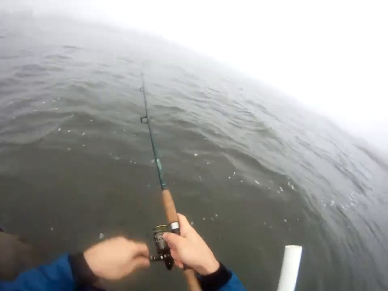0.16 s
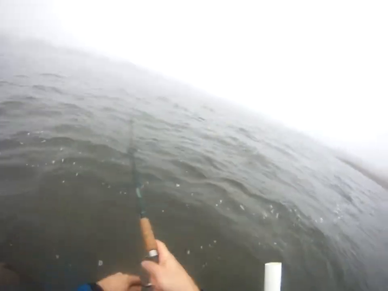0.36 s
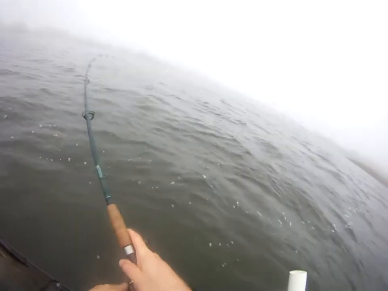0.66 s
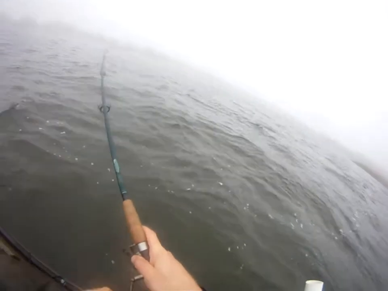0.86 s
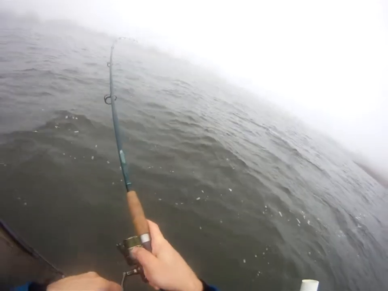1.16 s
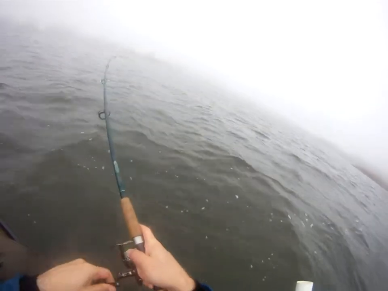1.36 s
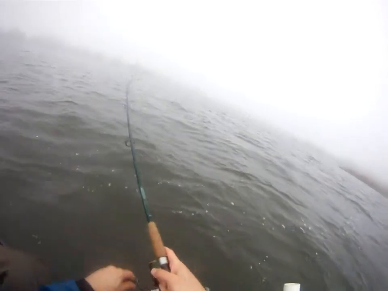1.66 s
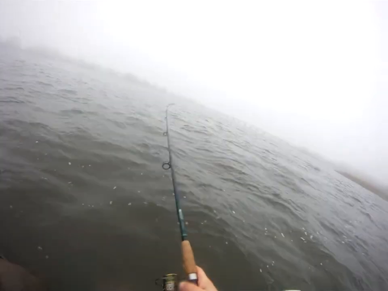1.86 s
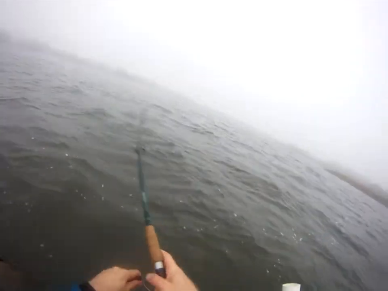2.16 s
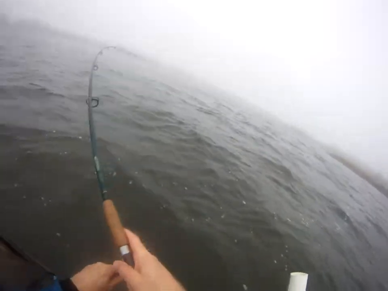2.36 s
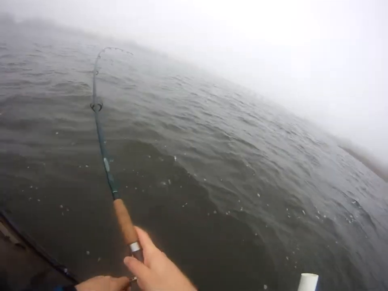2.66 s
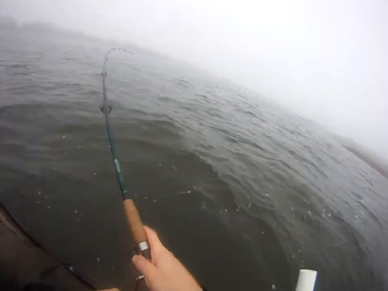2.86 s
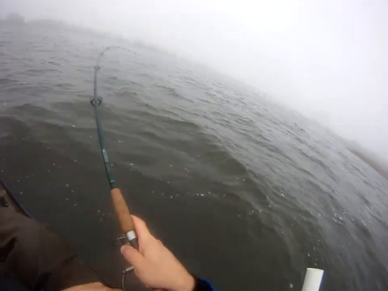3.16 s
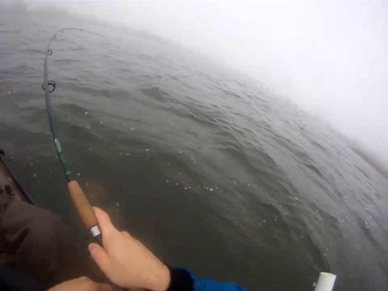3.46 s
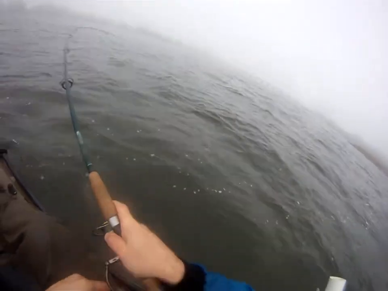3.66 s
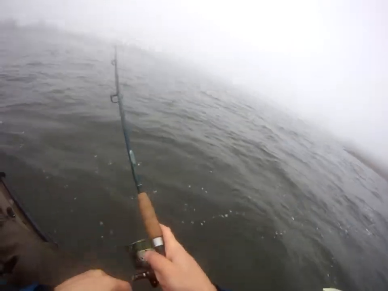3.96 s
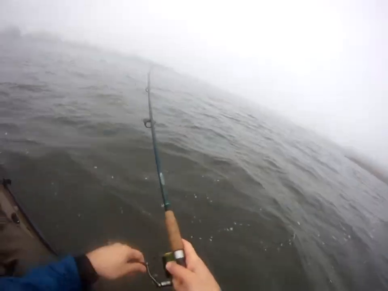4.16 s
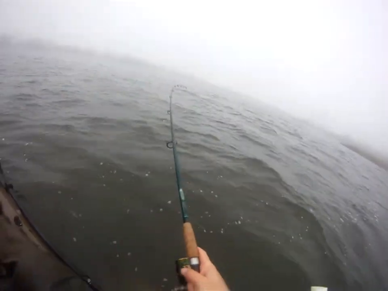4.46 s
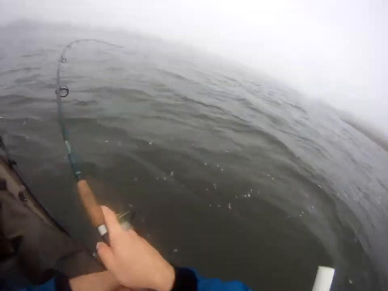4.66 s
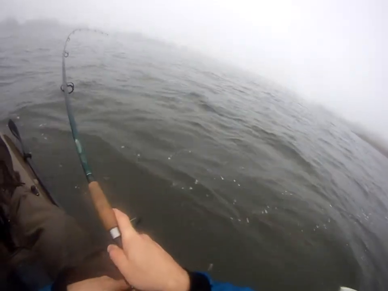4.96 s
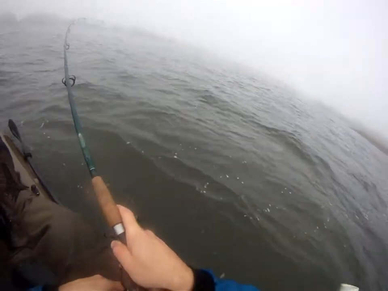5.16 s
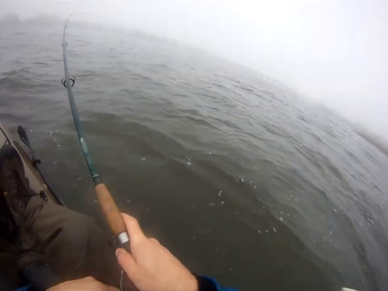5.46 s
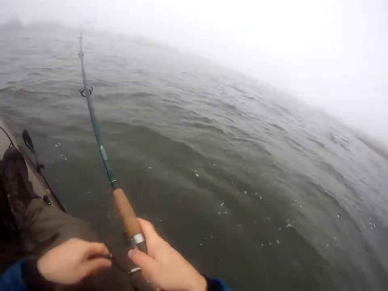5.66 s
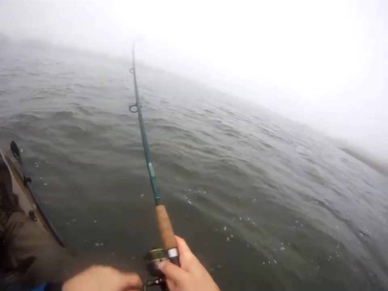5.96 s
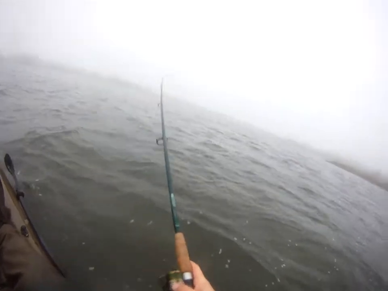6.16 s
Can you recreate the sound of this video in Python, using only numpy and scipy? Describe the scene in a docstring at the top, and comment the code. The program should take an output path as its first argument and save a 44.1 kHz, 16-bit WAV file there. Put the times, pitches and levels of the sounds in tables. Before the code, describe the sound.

Wind rumbles and water laps at a kayak while a fishing reel whirs and clicks, with short rasps of line.

```python
"""An angler in a kayak plays a fish. From the start, wind rumbles and wavelets lap and thud at the hull.
At 0.2 s he hauls the rod up: line and sleeve rasp, and the drag's pawl buzzes as the fish takes line.
He cranks, gears whirring, and hauls again at 2.1 s; the drag runs on, ticking faster, then slower.
A few knocks on the boat precede the third haul at 4.6 s. Last, he cranks and the taut line whines.
All is heard in mono through a small body-worn camera."""
import sys
import numpy as np
from scipy import signal
from scipy.fft import rfft, irfft, next_fast_len
from scipy.io import wavfile
from scipy.ndimage import uniform_filter1d, map_coordinates

SR = 44100
rng = np.random.default_rng(int(sys.argv[2]) if len(sys.argv) > 2 else 0)


def dump_mix(stems):
    """Bounce the given channels to the path in sys.argv[1] as a 16-bit WAV at rate SR."""
    frames = np.atleast_2d(stems).T  # one column per channel
    limited = np.clip(frames, -1, 1)  # hard clip at full scale
    pcm = np.round(limited * 32767).astype(np.int16)
    wavfile.write(sys.argv[1], SR, pcm)


N = 278271

# Table levels are relative; the functions add their own trims.
# Rod strokes. Each row: start and length in seconds, then line, spool, guide and sleeve levels in dB.
HAULS = [(0.238, 0.044, -43.5, -58, -50.5, -49), (0.392, .15, -46, -55.5, -52, -59.5),
         (2.114, 0.2, -47, -54.5, -49, -66), (2.238, .095, -49.5, -58.5, -63, -58.5),
         (3.214, 0.066, -53.5, -63.5, -73, -64.5), (4.573, 0.15, -45.5, -53.5, -55, -59)]
# Squeals at the top of a haul. Each row: crest and half-length in seconds, spool and guide levels in dB.
SQUEALS = [(2.145, 0.0063, -41.5, -50), (2.192, 0.019, -53, -39), (4.606, 0.011, -37, -52),
           (4.619, 0.02, -45, -35), (4.656, 0.017, -37.5, -42)]
# The fish takes line. Each row: start, fastest moment and end in seconds, top speed in clicks a second,
# click level in dB at the usual speed.
PULLS = [(0.384, 0.483, .626, 560, -52), (0.631, 0.699, .859, 160, -54), (1.257, 1.36, 1.4416, 30.3, -54.5),
         (1.93, 1.96, 2.0171, 30, -53), (2.03, 2.205, 2.29, 790, -49.5), (2.29, 2.309, 2.3984, 600, -48.5),
         (2.5566, 2.718, 2.9296, 142, -52), (3.077, 3.26, 3.3633, 145, -51.5),
         (3.3903, 3.379, 3.4887, 70, -48.5), (4.139, 4.215, 4.2394, 115, -55.5),
         (4.3903, 4.402, 4.4623, 48, -56), (4.538, 4.629, 4.8257, 540, -49.5)]
# The drag gives one tooth. Each row: time in seconds, level in dB.
TICKS = [(.9817, -55), (1.1017, -50), (1.1955, -56), (1.5105, -53.5), (1.564, -54), (1.606, -53.5),
         (2.451, -50.5), (2.4952, -48.5), (2.5238, -47), (3.5422, -52), (3.6112, -50), (3.6721, -59),
         (3.7466, -56), (3.8033, -55), (3.863, -54.5), (4.0996, -55), (4.917, -51.5), (5.01, -50.5),
         (5.058, -48), (5.0978, -51), (5.1455, -50), (5.221, -48)]
# Spells of cranking. Each row: start and length in seconds, level in dB, top whirr pitch in Hz.
CRANKS = [(0.0, 0.14, -60.5, 2220), (.66, 0.35, -65, 2140), (1.03, 0.18, -62.5, 2230),
          (1.468, .1, -62, 1980), (1.734, 0.31, -63, 2112), (2.39, 0.12, -61, 1930), (3.39, .16, -67, 1990),
          (3.937, 0.25, -59.5, 2307), (4.26, 0.028, -62, 2009), (4.331, 0.039, -57.5, 2330),
          (4.47, 0.078, -65, 2000), (5.19, .13, -66.5, 2153), (5.33, 0.44, -61, 2270),
          (5.78, 0.26, -62, 2364), (6.03, 0.086, -56, 2380), (6.15, 0.11, -59, 1978)]
# Whine of taut line. Each row: time in seconds, pitch in Hz, level in dB.
WHINE = [(5.3, 5450, -100), (5.42, 5510, -83), (5.56, 5626, -75), (5.68, 5664, -77), (5.78, 5380, -100)]
# Catches of line and sleeve. Each row: start in seconds, level in dB, centre in Hz.
SCUFFS = [(.0857, -49, 2010), (0.2472, -40, 1950), (0.413, -30.5, 1930), (0.5124, -36, 2180),
          (.5891, -39, 1940), (1.1702, -44, 2290), (1.5005, -44.5, 3750), (2.2458, -41, 1877),
          (3.4054, -48.5, 2190), (3.7274, -51.5, 1884), (4.5718, -38, 2021), (4.6998, -30.5, 1878),
          (4.8813, -42.5, 2450), (5.1351, -44, 2340), (5.459, -49, 1815), (5.5201, -43, 1930),
          (6.0541, -42, 1910)]
# Taps on the boat. Each row: start in seconds, level in dB, pitch in Hz.
KNOCKS = [(2.868, -45.5, 2146), (3.0095, -43, 1090), (4.264, -40.5, 1820)]
# Wavelets on the hollow hull. Each row: start in seconds, level in dB, centre in Hz.
THUDS = [(1.038, -47, 105), (2.098, -45, 113), (2.289, -48, 92), (2.863, -43, 88.8), (2.94, -48, 92)]
# Gusts on the microphone. Each row: crest and half-length in seconds, level in dB.
GUSTS = [(0.263, 0.24, -44.5), (0.542, 0.045, -39), (0.73, 0.095, -44), (1.199, .16, -49.5),
         (1.69, .08, -52), (2.245, 0.43, -41.5), (2.676, 0.17, -70), (4.173, 0.027, -40), (4.567, .11, -45),
         (5.436, 0.087, -56), (5.863, 0.087, -63), (6.17, 0.21, -47.5)]
# Soft rush of air. Each row: time in seconds, level in dB.
RUSH = [(0, -57.5), (0.27, -59), (0.6, -57.5), (0.88, -60.5), (1.08, -57), (1.52, -59.5), (2.12, -56),
        (2.7, -57), (2.9, -55.5), (3.2, -57.5), (3.7, -59), (4.3, -56.5), (4.7, -54.5), (5.05, -60.0),
        (5.62, -53.5), (6.31, -57)]

# Resonances. Each row: centre in Hz, width in Hz, gain in dB.
SPOOL_MODES = [(2918, 75, -1.5), (3083, 23, 5.5)]
GUIDE_MODES = [(3560, 96, 6), (3746, 93, -1)]
PAWL_MODES = [(4750, 150, 2), (5420, 324, -4.5)]

# Spectra. Each row: frequency in Hz, gain in dB.
LINE_SPECTRUM = [(500, -55), (900, -17), (1200, -2.5), (1550, -15.5), (1900, 6.5), (2200, 1.5),
                 (2650, -6.5), (3050, -23), (3300, -12), (3560, -0.5), (3850, -4), (4300, -20),
                 (5800, -13.5)]
SLEEVE_SPECTRUM = [(150, -9), (270, 3.5), (420, -29), (600, -12.5), (850, -3.5), (1200, -0.5), (1500, -4),
                   (2500, -15), (5000, -45)]
CRANK_SPECTRUM = [(500, -29), (900, -20), (1200, 0.5), (1550, -10.5), (1900, 2), (2250, 1.5), (2750, -10),
                  (3050, -3), (3280, -19), (3600, -5), (4300, -16), (5400, -15), (5900, -46)]
HULL_SPECTRUM = [(250, -19), (900, 14), (2200, 4), (4000, -14)]
WATER_SPECTRUM = [(100, -24), (300, 6.5), (550, 2.5), (1150, 2), (1550, 0), (2100, 4), (2800, -2),
                  (3600, -2), (4300, -8.5), (5000, -9), (5900, -9)]
BUFFET_SPECTRUM = [(8, -12.5), (14, 6), (25, -2), (42, -4), (55, -6), (75, -15.5), (110, -29), (200, -75)]
AIR_SPECTRUM = [(40, -38), (75, -3.5), (105, 1), (170, -5), (260, -9), (350, -22), (600, -29), (1200, -33)]


def hauls(attack_s=0.028, release_s=0.064):
    """Taut line rasps over ringing guides, the spinning spool sings, the sleeve brushes the jacket."""
    strokes = (np.outer(amp(dbs), stroke(s, length_s, attack_s, release_s))
               for s, length_s, *dbs in HAULS)
    line_gain, spool_gain, guide_gain, sleeve_gain = power_sum(strokes)
    squeals = (np.outer(amp(dbs), swell(s, half_s)) for s, half_s, *dbs in SQUEALS)
    spool_squeal, guide_squeal = power_sum(squeals)
    line = amp(-1.5 + 1.2 * wobble(70)) * line_gain
    line *= friction(colour(LINE_SPECTRUM), slips_per_s=6000, spread_db=2, patchy_db=2)
    spool = amp(-2 + 0.63 * wobble(70)) * power_sum([spool_gain, spool_squeal])
    spool *= friction(resonant(SPOOL_MODES), slips_per_s=3000, spread_db=1, patchy_db=2)
    guides = amp(-7.5) * power_sum([guide_gain, guide_squeal])
    guides *= friction(resonant(GUIDE_MODES), slips_per_s=4000, spread_db=0, patchy_db=2.5)
    sleeve = amp(-0.5) * sleeve_gain
    sleeve *= friction(colour(SLEEVE_SPECTRUM), slips_per_s=6000, spread_db=2.5, patchy_db=5)
    return line + spool + guides + sleeve


def drag(usual_hz=50, db_per_octave=0.47, jitter_s=0.00065, scatter_db=1.57):
    """One click a tooth, singly or in runs; a faster spool flicks the pawl harder."""
    clicks = list(TICKS)
    for *motion, db in PULLS:
        clicks += [(s, db + db_per_octave * np.log2(hz / usual_hz)) for s, hz in teeth(*motion)]
    out = np.zeros(N)
    for s, db in clicks:
        add(out, s + rng.normal(0, jitter_s), amp(db + rng.normal(0, scatter_db)) * pawl_click())
    return out


def teeth(start_s, fastest_s, end_s, top_hz, start_hz=28, stop_hz=42):
    """Time and click rate at each tooth as the spool speeds up and slows exponentially."""
    t = np.linspace(start_s, end_s, SR // 10)
    rate_hz = np.exp(np.interp(t, [start_s, fastest_s, end_s], np.log([start_hz, top_hz, stop_hz])))
    turned = np.cumsum(rate_hz) * (t[1] - t[0])
    marks = np.linspace(0, turned[-1], round(turned[-1]) + 1)
    return zip(np.interp(marks, turned, t), np.interp(marks, turned, rate_hz))


def pawl_click(drop_s=0.0003, rebound_s=0.0014, rebound_db=-3, rattle_db=-23, t60_s=0.043):
    """The pawl drops off a tooth, rebounds once and rattles out; pitch varies by tooth. Peak 1."""
    t = np.arange(SR // 60) / SR
    contact = amp(rattle_db - 60 * t / t60_s) * rng.standard_normal(len(t))
    add(contact, drop_s, [1])
    bounce_s = drop_s + rebound_s * np.exp(rng.normal(0, 0.24))
    add(contact, bounce_s, [amp(rebound_db + rng.normal(0, 1))])
    detune = np.exp(0.015 * rng.standard_normal())
    highpass = lambda f: 1 / np.sqrt(1 + (4200 / (f + 1)) ** 16)
    click = filtered(contact, lambda f: resonant(PAWL_MODES)(f / detune) * highpass(f))
    return click / np.abs(click).max()


def crank(attack_s=0.02, release_s=0.032, slow_hz=1945):
    """Gears whirr higher as the handle speeds up; line scrapes on roller and guides."""
    t = np.arange(N) / SR
    gain, pitch_hz = 0, slow_hz
    for s, length_s, db, top_hz in CRANKS:
        gain = np.maximum(gain, amp(db) * stroke(s, length_s, attack_s, release_s))
        pitch_hz += (top_hz - slow_hz) * np.sin(np.pi * np.clip((t - s) / length_s, 0, 1))
    scrape = amp(-1) * friction(colour(CRANK_SPECTRUM), slips_per_s=3000, spread_db=2, patchy_db=3.5)
    guides = amp(-13.5 + 1.5 * wobble(8))
    guides *= friction(resonant(GUIDE_MODES), slips_per_s=4700, spread_db=2.5, patchy_db=1.5)
    whirr = amp(-4.5) * narrow_noise(pitch_hz + 60 * wobble(16), width_hz=96)
    return amp(1 + 1.2 * wobble(45)) * gain * (scrape + guides + whirr)


def line_whine():
    """Taut line whines thinly on a gliding pitch."""
    hz, db = curves(WHINE)
    return amp(db) * narrow_noise(hz, width_hz=80)


def scuffs():
    """Line and sleeve catch briefly."""
    out = np.zeros(N)
    for s, db, hz in SCUFFS:
        catch = burst(hz, colour(LINE_SPECTRUM), width_hz=1800, attack_s=0.002, t60_s=0.041)
        add(out, s, amp(db - 0.5) * catch)
    return out


def knocks(tock_t60_s=0.0063):
    """Taps on the boat's dull plastic: a damped tone and a crack."""
    out, t = np.zeros(N), np.arange(SR // 10) / SR
    for s, db, hz in KNOCKS:
        tock = np.sin(2 * np.pi * hz * t) * amp(-60 * t / tock_t60_s)
        crack = amp(-4) * burst(hz, colour(HULL_SPECTRUM), width_hz=1500, attack_s=0.00018, t60_s=0.03)
        add(out, s, amp(db) * (tock + crack))
    return out


def hull_thuds():
    """A wavelet gives the hull a soft push that dies within a few cycles."""
    out = np.zeros(N)
    lowpass = lambda f: 1 / (1 + (f / 420) ** 4)
    for s, db, hz in THUDS:
        add(out, s, amp(db - 3) * burst(hz, lowpass, width_hz=90, attack_s=0.004, t60_s=0.07))
    return out


def water(wash_db=-62, lap_db=-69, bubble_hz=900, life_cycles=7, rise=0.226, count=260):
    """Chop washes steadily; lapping wavelets leave small bubbles that ring with rising pitch."""
    bubbles, t = np.zeros(N), np.arange(SR // 20) / SR
    for when, (pitch, size) in zip(rng.random(count), rng.standard_normal((count, 2))):
        hz = bubble_hz * np.exp(0.5 * pitch)
        age = t * hz / life_cycles
        envelope = amp(4.5 * size) * age * np.exp(1 - 2 * age)
        chirp = np.sin(2 * np.pi * hz * t * (1 + rise * age / 2))
        add(bubbles, when * N / SR, envelope * chirp)
    wash = amp(wash_db + 0.09 * wobble(4.96)) * noise(colour(WATER_SPECTRUM))
    return wash + amp(lap_db) * bubbles


def wind(breeze_db=-51):
    """Gusts over a steady breeze buffet the microphone port, with a softer rush above them."""
    gusts = [amp(db) * swell(s, half_s) for s, half_s, db in GUSTS]
    buffet = power_sum([amp(breeze_db)] + gusts) * noise(colour(BUFFET_SPECTRUM))
    rush_db, = curves(RUSH)
    return buffet + amp(rush_db - 3.5) * noise(colour(AIR_SPECTRUM))


def friction(response, slips_per_s, spread_db, patchy_db):
    """Tiny random slips ring a body whose colour shifts as the contact moves. Rms 1."""
    slips = (rng.random(N) < slips_per_s / SR) * rng.standard_normal(N)
    slips *= amp(spread_db * rng.standard_normal(N))
    spectra = signal.stft(slips, nperseg=512)[2]
    patches = uniform_filter1d(rng.standard_normal(spectra.shape), size=6, axis=0)
    patches = uniform_filter1d(patches, size=5, axis=1)
    force = signal.istft(spectra * amp(patchy_db * unit(patches)), nperseg=512)[1][:N]
    return unit(filtered(force, response))


def burst(hz, body, width_hz, attack_s, t60_s):
    """A short noisy contact on a body, with its own resonance. Peak 1."""
    t = np.arange(SR // 10) / SR
    push = rng.standard_normal(len(t)) * (1 - np.exp(-t / attack_s)) * amp(-60 * t / t60_s)
    sound = filtered(push, lambda f: body(f) * resonant([(hz, width_hz, 0)])(f))
    return sound / np.abs(sound).max()


def narrow_noise(hz, width_hz):
    """A noise band on a moving pitch. Rms 1."""
    drift = lambda: noise(lambda f: 1 / (1 + (f / width_hz) ** 2))
    phase = 2 * np.pi * np.cumsum(hz) / SR
    return unit(drift() * np.cos(phase) + drift() * np.sin(phase))


def noise(response):
    """Coloured noise. Rms 1."""
    return unit(filtered(rng.standard_normal(N), response))


def colour(points):
    """Response through (Hz, dB) points on a log axis."""
    hz, db = np.transpose(points)
    return lambda f: amp(np.interp(np.log(f + 1), np.log(hz), db))


def resonant(modes):
    """Causal response of resonances, alternating in sign."""
    return lambda f: sum((-1) ** k * amp(db) * 1j * f * width_hz / (hz * hz - f * f + 1j * f * width_hz)
                         for k, (hz, width_hz, db) in enumerate(modes))


def filtered(x, response):
    """x through a frequency response."""
    size = next_fast_len(len(x) + 8192)
    return irfft(rfft(x, size) * response(np.fft.rfftfreq(size, 1 / SR)), size)[:len(x)]


def stroke(start_s, length_s, attack_s, release_s):
    """Gain that builds up to its start, holds, then dies away."""
    t = np.arange(N) / SR - start_s
    return np.exp(np.minimum(t, 0) / attack_s - np.maximum(t - length_s, 0) / release_s)


def swell(crest_s, half_s):
    """Bell-shaped gain."""
    return np.exp(-0.5 * ((np.arange(N) / SR - crest_s) / half_s) ** 2)


def wobble(knots_per_s):
    """Smooth random curve."""
    knots = rng.standard_normal(int(N * knots_per_s / SR) + 4)
    return map_coordinates(knots, [np.arange(N) * knots_per_s / SR])


def curves(rows):
    """One value per sample for each column after the time."""
    s, *columns = np.transpose(rows)
    return np.array([np.interp(np.arange(N) / SR, s, column) for column in columns])


def power_sum(gains):
    """Gains added in power."""
    return np.sqrt(sum(g ** 2 for g in gains))


def add(track, s, sound):
    """Mix a sound in at s seconds."""
    part = track[max(round(s * SR), 0):][:len(sound)]
    part += sound[:len(part)]


def amp(db):
    """Decibels to gain."""
    return 10 ** (np.asarray(db) / 20)


def unit(x):
    """x at rms 1."""
    return x / np.sqrt(np.mean(x ** 2) + 1e-20)


def scene():
    """All sources at one microphone."""
    mono = wind() + water() + hull_thuds() + crank() + line_whine()
    mono += hauls() + scuffs() + knocks() + drag()
    return np.array([mono, mono])


def record(dry, band_hz=5680, sample_hz=12000, top_hz=15400):
    """The camera's slow sample-and-hold mirrors the band into the treble, falling as 1 / f."""
    band = filtered(dry[0], lambda f: 1 / np.sqrt(1 + (f / band_hz) ** 70))
    carrier = 2 * np.cos(2 * np.pi * sample_hz * np.arange(N) / SR)
    images = filtered(band, lambda f: f) * carrier
    mirror = filtered(images, lambda f: 1 / np.maximum(f, sample_hz / 2))
    out = filtered(band + amp(0.5) * mirror, lambda f: f < top_hz)
    return np.array([out, out])


dry = scene()
out = record(dry)
dump_mix(out)
```